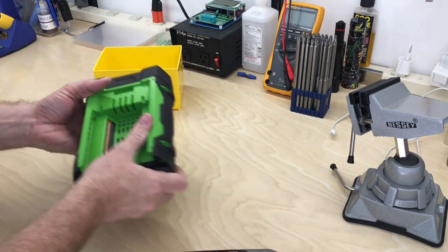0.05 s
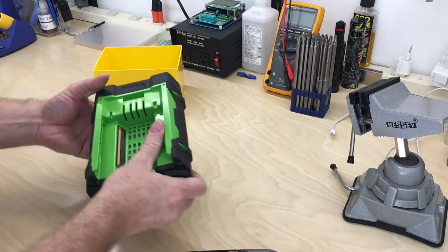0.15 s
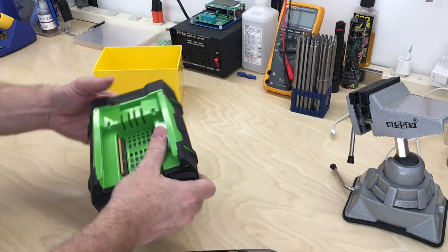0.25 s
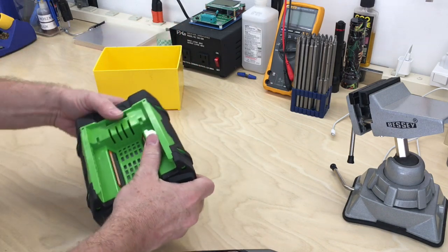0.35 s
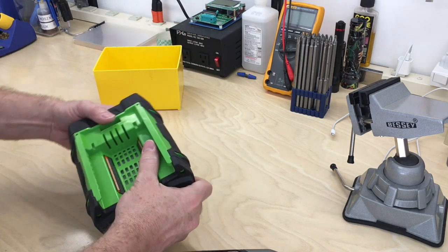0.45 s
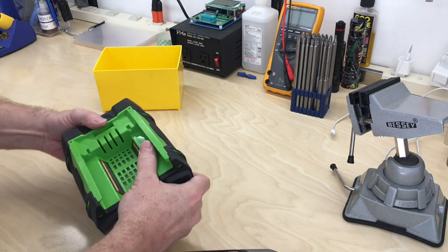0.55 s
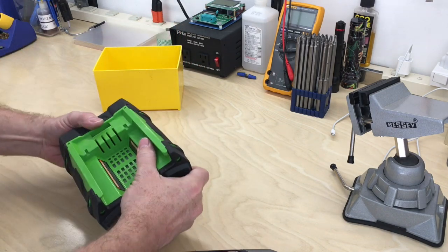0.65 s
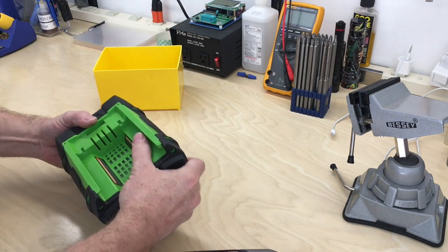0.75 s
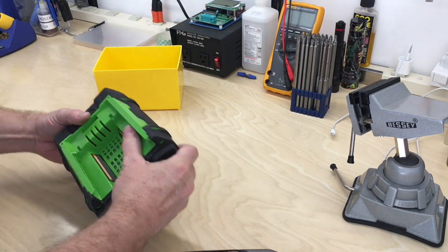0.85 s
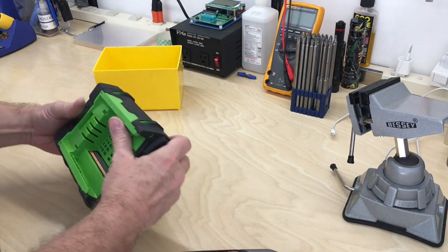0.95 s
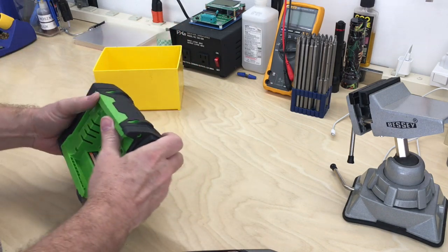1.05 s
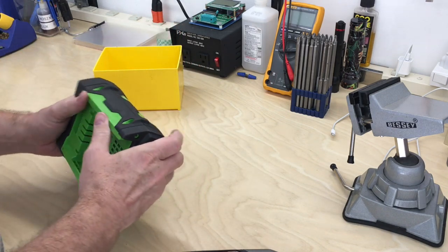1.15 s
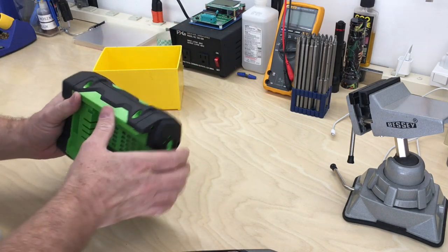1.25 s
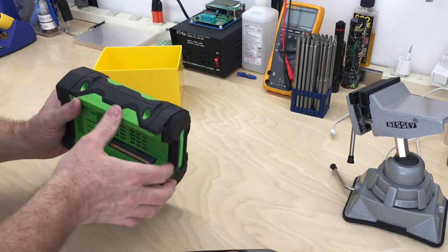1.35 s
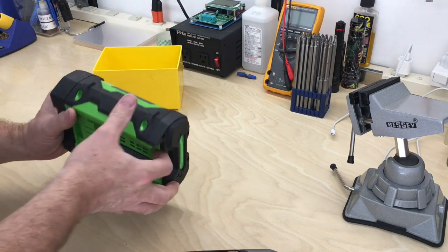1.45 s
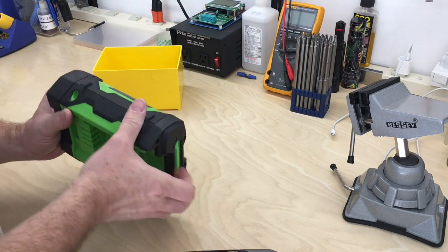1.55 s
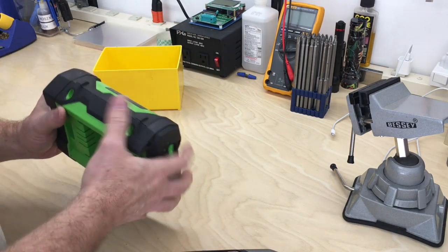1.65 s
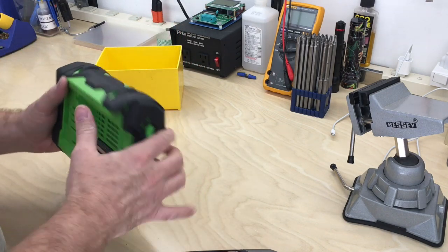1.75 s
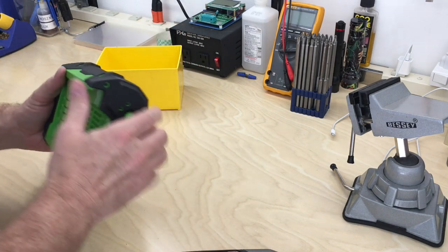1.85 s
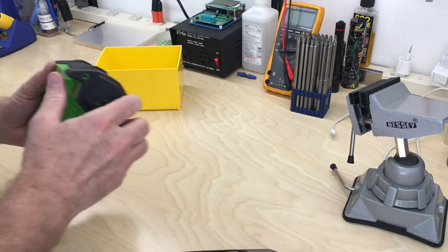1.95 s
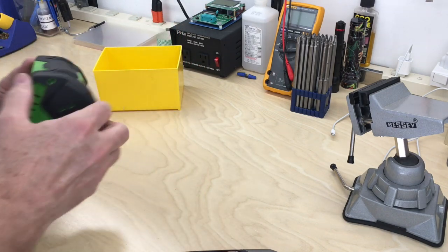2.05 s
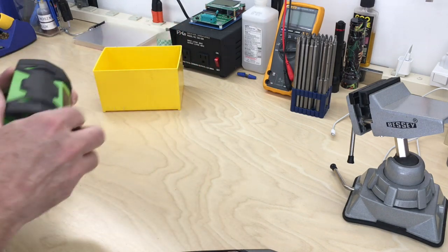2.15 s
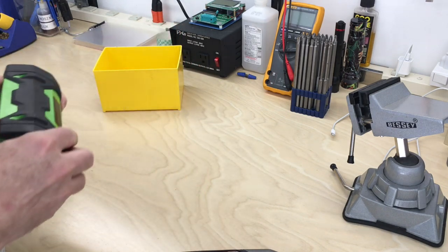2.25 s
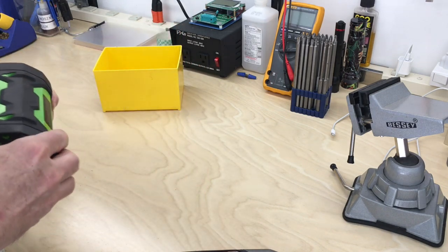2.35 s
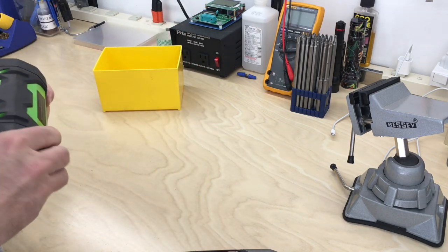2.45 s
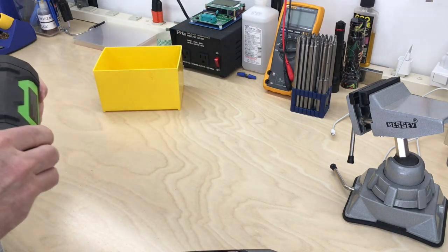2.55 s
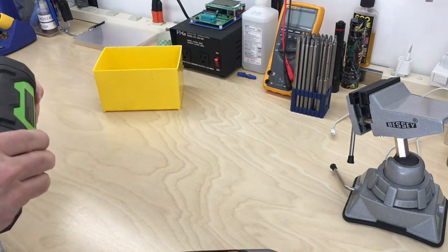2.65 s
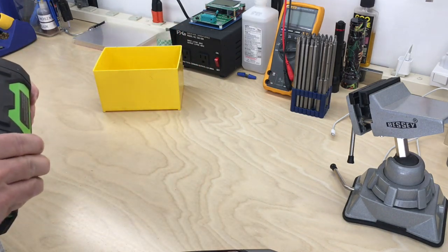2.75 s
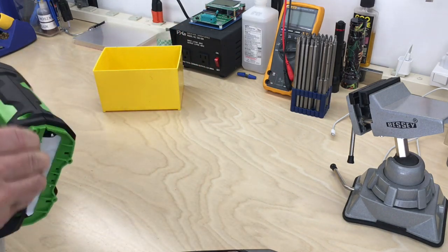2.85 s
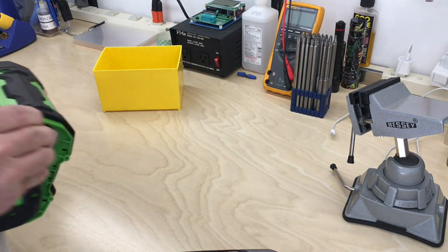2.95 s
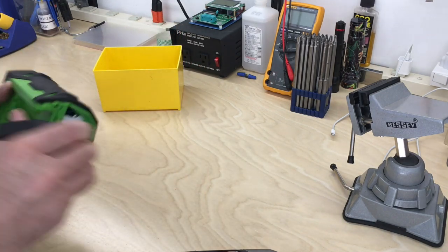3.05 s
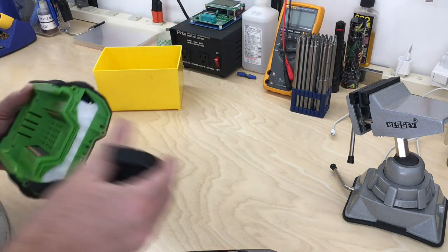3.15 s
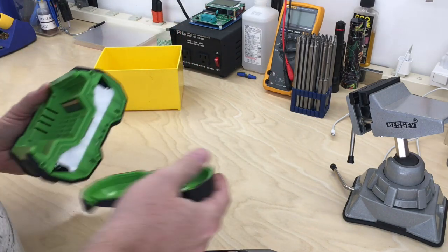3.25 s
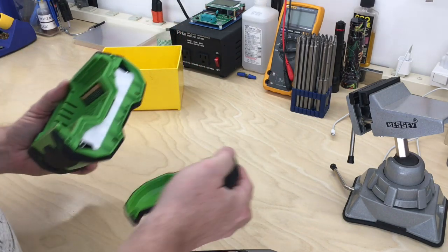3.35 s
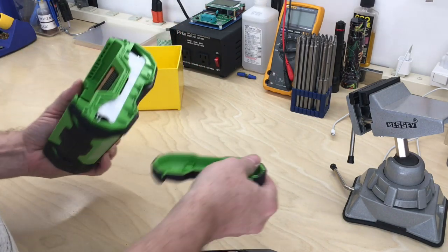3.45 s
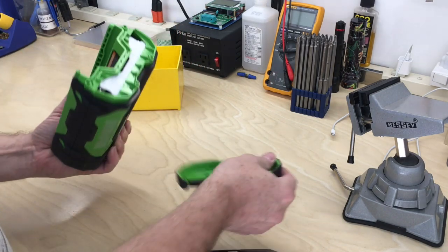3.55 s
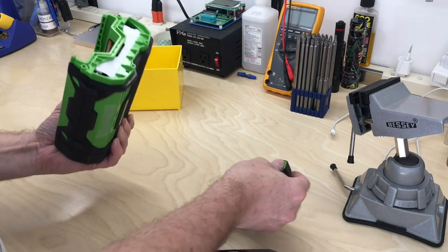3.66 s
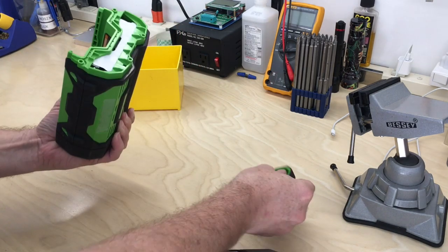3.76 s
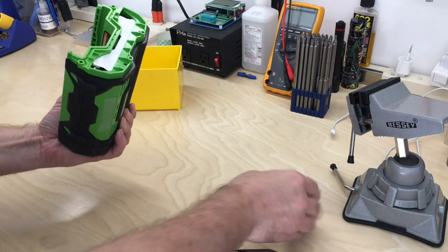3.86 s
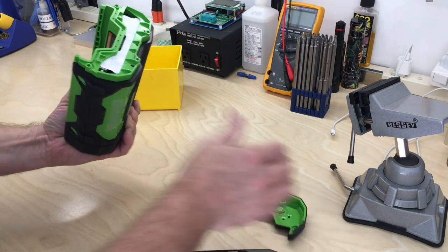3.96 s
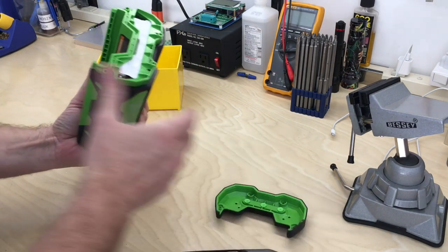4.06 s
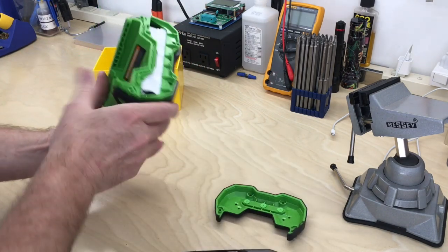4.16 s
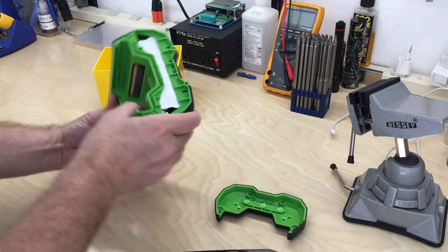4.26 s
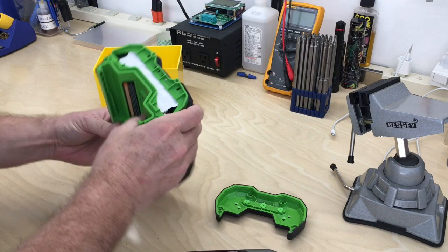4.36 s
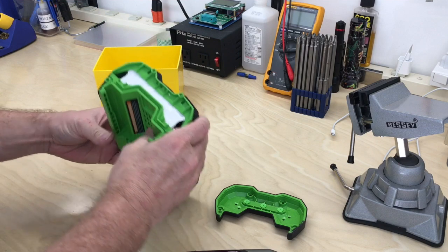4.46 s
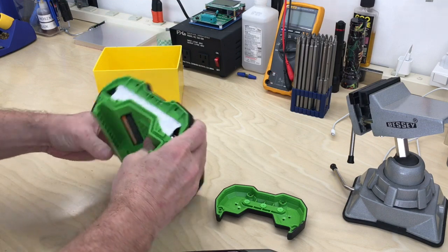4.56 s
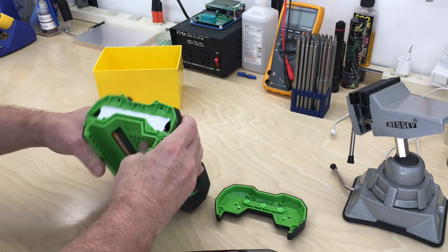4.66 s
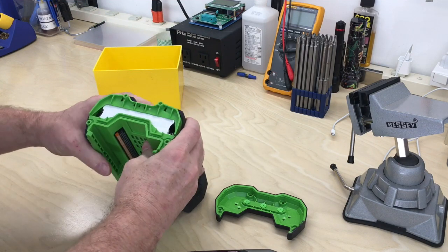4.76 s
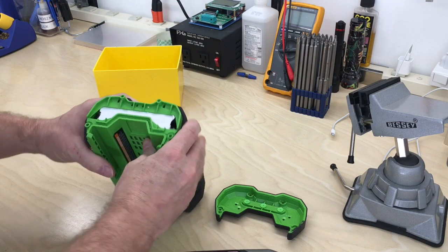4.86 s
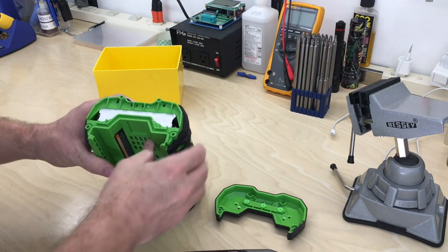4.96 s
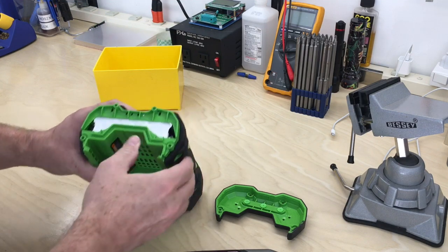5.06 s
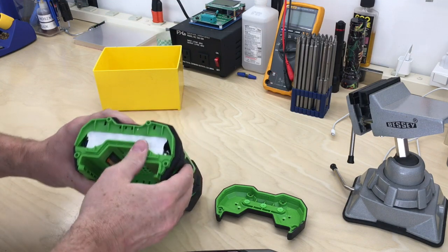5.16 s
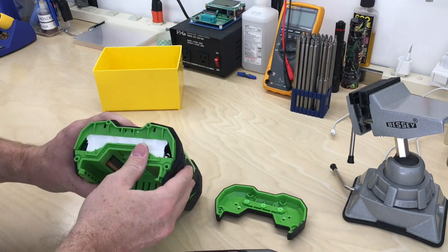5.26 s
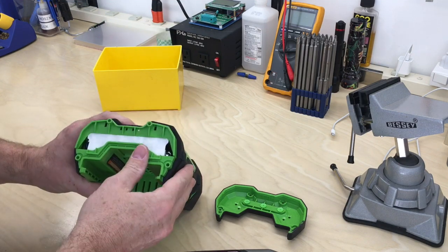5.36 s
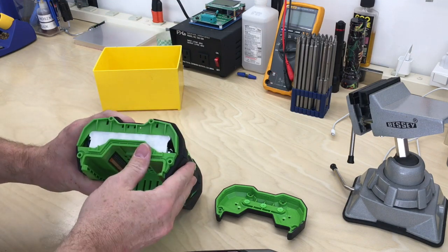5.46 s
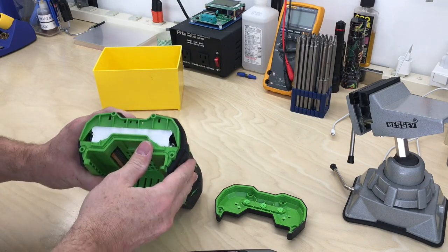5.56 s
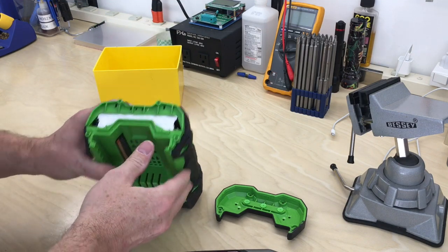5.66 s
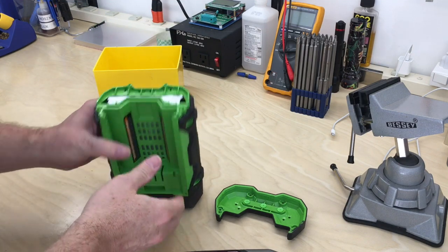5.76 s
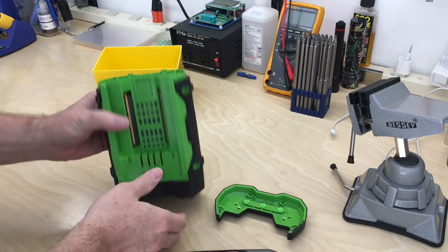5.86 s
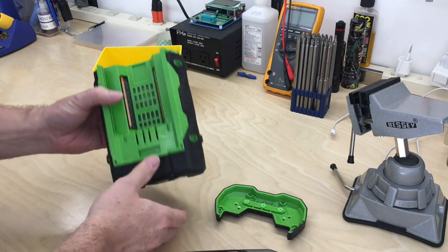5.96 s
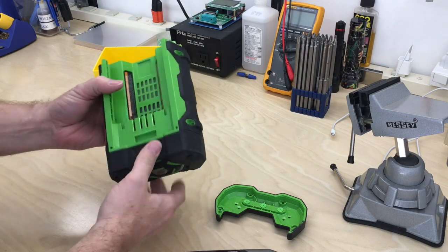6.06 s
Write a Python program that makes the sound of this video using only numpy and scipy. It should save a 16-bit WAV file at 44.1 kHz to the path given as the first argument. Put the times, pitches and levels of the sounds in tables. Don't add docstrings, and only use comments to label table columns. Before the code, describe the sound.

A quiet workshop with soft low ventilation, slight microphone hiss and a very faint high electrical whine. From 0 s, skin rubs hard plastic in gentle strokes with barely audible ticks. From about 0.6 to 3.3 s a distant wren repeats a quick, high trilling phrase, echoing outdoors; a hoarse falling chip comes at 1.2 s and again, fainter, at 3.6 s. Firmer seam ticks come near 1.5 and 1.8 s, then a sharper one at 2.55 s. At 2.8-2.95 s plastic clips let go in a rapid, loud burst of dry snaps, trailing small rattles. At 3.85 s the light cap lands on wood, bounces hard at 3.98 s, then rocks and scrapes to rest by 4.3 s. Handling rubs and clicks lead to a heavy low thud at 4.78 s, a soft shift at 4.98 s, faint rubbing, and a firmer second set-down at 5.89 s, with short room echo.

```python
import sys
import numpy as np
from scipy import signal
from scipy.fft import rfft, irfft, next_fast_len
from scipy.io import wavfile
from scipy.ndimage import uniform_filter1d

SR = 44100
rng = np.random.default_rng(int(sys.argv[2]) if len(sys.argv) > 2 else 0)


def boost(x):
    u = np.asarray(x, float) / 20
    return 10 ** u


def output_pcm(signal):
    pcm = np.clip(np.atleast_2d(signal).T, -1, 1) * 32767
    wavfile.write(sys.argv[1], SR, np.round(pcm).astype(np.int16))


N = 269892

# freq_hz, t60_s
ROOM_DECAY = [(100, 0.85), (700, 0.61), (2000, 0.55), (5000, .4), (12000, 0.21)]
# freq_hz, level_db (per Hz)
SLIDING_HISS = [(1500, -34), (3500, 7.5), (6000, 3.5), (10000, -1), (15500, -4.5), (16500, -45.5)]
SCATTER_DB = 1.7


def unit(x):
    return x / np.sqrt(np.mean(x ** 2) + 1e-20)


def along(points, hz):
    f, v = np.transpose(points)
    return np.interp(np.log(hz + 1), np.log(f + 1), v)


def filtered(x, response):
    m = next_fast_len(len(x) + 8192)
    return irfft(rfft(x, m) * response(np.fft.rfftfreq(m, 1 / SR)), m)[:len(x)]


def coloured(spectrum, x):
    return unit(filtered(x, lambda hz: boost(along(spectrum, hz))))


def reverb(x, decays, gap_s):
    hz, t, z = signal.stft(rng.standard_normal(SR // 2), SR, nperseg=256)
    decay = boost(-60 * t / np.abs(along(decays, hz))[:, None])
    tail = signal.istft(z * decay, SR, nperseg=256)[1]
    delayed = np.pad(x, (round(gap_s * SR), 0))
    return signal.fftconvolve(delayed, tail / np.linalg.norm(tail))


def add(track, start_s, sound):
    part = track[round(start_s * SR):][:len(sound)]
    part += sound[:len(part)]


def air():
    # freq_hz, level_db (per Hz)
    vent = [(12, -41.5), (20, -11), (65, -3.5), (130, -6), (216, 1), (285, -4.5), (347, -11.5), (698, -34)]
    # freq_hz, level_db (per Hz)
    mic_hiss = [(100, -22.5), (698, -23), (1600, -28), (4810, -38), (7310, -36.5), (13900, -44.5),
                (16000, -63.5)]
    # time_s, level_db
    charger = [(0, -102), (.7, -86), (2, -81), (3.8, -77.5), (4.6, -81.5), (6.12, -85)]
    # freq_hz, width_hz, level_db
    whines = [(7280, 300, -88.5), (9440, 300, -94.5), (10900, 250, -101)]
    charger_hz = 1534
    t = np.arange(N) / SR
    out = boost(-65.5) * coloured(vent + [(2000, -87.5)], rng.standard_normal(N))
    out += boost(-74.5) * coloured(mic_hiss, rng.standard_normal(N))
    out += boost(np.interp(t, *np.transpose(charger))) * np.sin(2 * np.pi * charger_hz * t)
    for hz, width_hz, db in whines:
        band = filtered(rng.standard_normal(N), lambda f: np.exp(-((f - hz) / width_hz) ** 2))
        out += boost(db) * unit(band)
    return out


def whistle(length_s, from_hz, to_hz, hoarse_rad):
    u = np.linspace(0, 1, round(length_s * SR))
    rasp = hoarse_rad * unit(uniform_filter1d(rng.standard_normal(len(u)), size=60))
    phase = 2 * np.pi * np.cumsum(from_hz + (to_hz - from_hz) * u) / SR
    return np.sin(phase + rasp) * np.sqrt(np.sin(np.pi * u) + 1e-9)


def wren():
    # start_s, length_s, from_hz, to_hz, level_db
    notes_sung = [
        (0, 0.05, 3116, 3420, 1),
        (0.044, .035, 3447, 3874, -1),
        (0.072, .045, 3900, 4075, 0),
        (0.121, 0.054, 4740, 4520, -3.5),
        (0.154, 0.037, 2890, 2880, 2.5),
        (0.192, 0.063, 2408, 2225, -4),
    ]
    # freq_hz, t60_s
    yard_decay = [(2000, 0.92), (5000, 0.51)]
    first_s, spacing_s, slowing_s = 0.609, 0.291, 0.0016
    song_db, warm_up_db, warm_up_phrases = -67, -3.5, 3.0
    sag_per_phrase, last_pitch = 0.005, 0.935
    out = np.zeros(N)
    for k in range(9):
        start_s = first_s + spacing_s * k + slowing_s * k * k
        phrase_db = song_db + warm_up_db * np.exp(-k / warm_up_phrases)
        pitch = 1 - sag_per_phrase * k if k < 8 else last_pitch
        phrase = np.zeros(SR // 3)
        for note_s, length_s, from_hz, to_hz, note_db in notes_sung:
            droop = pitch if note_s < 0.1 else pitch ** 0.25
            note = whistle(length_s, from_hz * droop, to_hz * droop, hoarse_rad=0.55)
            add(phrase, note_s, boost(phrase_db + note_db + rng.normal(0, 1.2)) * note)
        add(out, start_s, 0.2 * phrase)
        add(out, start_s, reverb(phrase, yard_decay, gap_s=0.0017))
    return out


def chipping_bird():
    # start_s, length_s, from_hz, to_hz, level_db
    chips = [
        (1.225, 0.038, 5700, 2996, -52.5),
        (3.55, 0.039, 5330, 2957, -55),
    ]
    # freq_hz, t60_s
    tree_decay = [(3000, 0.83), (5500, 0.3)]
    out = np.zeros(N)
    for start_s, length_s, from_hz, to_hz, db in chips:
        chip = whistle(length_s, from_hz, to_hz, hoarse_rad=1.1)
        add(out, start_s, boost(db) * reverb(chip, tree_decay, gap_s=0))
    return out


def friction(strokes, layers, rise, grain_db, grain_samples):
    grain = boost(grain_db * unit(uniform_filter1d(rng.standard_normal(N), grain_samples)))
    peak_s, length_s, db, bright_db = np.transpose(strokes)[..., None]
    late_s = np.arange(0, N + 64, 64) / SR - peak_s
    side_s = length_s * np.where(late_s < 0, rise, 1 - rise)
    swell = np.exp(-2 * (late_s / side_s) ** 2)
    out = np.zeros(N)
    for spectrum, layer_db, share in layers:
        level = np.sum(boost(db + layer_db + share * bright_db) * swell, axis=0)
        out += np.repeat(level, 64)[:N] * coloured(spectrum, rng.standard_normal(N) * grain)
    return out


def rubbing_hands():
    # peak_s, length_s, pressure_db, hiss_db (re pressure)
    strokes = [(0.0, 0.3, -68.5, 1.5), (.19, 0.1, -69, 2), (.325, 0.14, -74, 3), (.47, 0.06, -86.5, 10.5),
               (.6, 0.065, -76.5, -1), (1.02, .06, -84, 8), (1.265, 0.19, -75, -2),
               (1.465, 0.0692, -73, 1.5), (1.632, 0.046, -66, 1.5), (1.775, 0.09, -70, 1),
               (1.972, 0.049, -76.5, 8), (2.15, .08, -80.5, 8.5), (2.262, 0.086, -80, 4),
               (2.445, 0.063, -72, 0), (3.56, 0.7, -83.5, 5.5), (4.3, 0.12, -72, 2),
               (4.434, 0.045, -68, -0.5), (4.48, 0.069, -73.5, 1.5), (4.72, 0.35, -73, -2.5),
               (4.945, 0.095, -70, -1), (5.035, 0.093, -76, 3), (5.258, 0.061, -68.5, -2),
               (5.715, 0.12, -72.5, -2), (1.9, 2.3, -81.5, -5)]
    # freq_hz, level_db (per Hz)
    creak = [(250, -59), (550, -1.5), (800, 1.5), (1300, 2), (2200, -28)]
    # freq_hz, level_db (per Hz)
    scrape = [(800, -66.5), (1500, 3), (2300, 2.5), (3500, -9.5), (6000, -45.5)]
    layers = ((creak, -2.5, -0.3), (scrape, 0, 0), (SLIDING_HISS, 0, 1))
    return friction(strokes, layers, rise=0.51, grain_db=1.0, grain_samples=90)


def rocking_cap():
    # peak_s, length_s, pressure_db, scrape_db (re pressure)
    rocks = [
        (3.865, 0.056, -42, -9),
        (3.915, .06, -45.5, -12.5),
        (3.962, 0.0075, -45, -5.5),
        (4.085, 0.051, -46.5, 2),
        (4.155, 0.046, -47, -6.5),
        (4.205, 0.035, -46.5, -4),
        (4.245, 0.16, -50, -1.5),
    ]
    # freq_hz, level_db (per Hz)
    rumble = [(70, -36.5), (120, -10.5), (200, 8.5), (320, 8), (450, -2), (800, -57.5)]
    # freq_hz, level_db (per Hz)
    grind = [(300, -26.5), (500, 14), (1100, 13), (1800, -4), (3000, -32), (5000, -47.5)]
    layers = ((rumble, 0, 0), (grind, 0, 1), (SLIDING_HISS, -37.5, 0))
    return friction(rocks, layers, rise=0.4, grain_db=-1, grain_samples=200)


def bench(landings, modes, split_hz):
    out, t = np.zeros(N), np.arange(SR) / SR
    for start_s, db, upper_db, contact_s in landings:
        wood = np.zeros(SR)
        for k, (hz, mode_db, t60_s) in enumerate(modes):
            level_db = mode_db + upper_db * (hz > split_hz) + rng.normal(0, SCATTER_DB)
            ring = boost(level_db - 60 * t / t60_s) * np.sin(2 * np.pi * hz * t)
            wood += (-1) ** k * ring
        push = t / contact_s * np.exp(-3 * t / contact_s)
        add(out, start_s, boost(db) * signal.fftconvolve(wood, push[:2000] / push.sum()))
    out += boost(-15) * reverb(out, ROOM_DECAY, gap_s=0.00796)[:N]
    return filtered(out, lambda f: (1j * f / (1j * f + 40)) ** 2)


def shell_response(f, shell, upper_db):
    total = 0
    for k, (hz, width_hz, mode_db) in enumerate(shell):
        level_db = mode_db + upper_db / (1 + (1500 / hz) ** 6) + rng.normal(0, SCATTER_DB)
        resonance = 1j * f * width_hz / (hz * hz - f * f + 1j * f * width_hz)
        total = total + (-1) ** k * boost(level_db) * resonance
    return total


def contacts(events, shell, room_db):
    # freq_hz, level_db (per Hz)
    crack_spectrum = [(1470, -33.5), (2500, -4), (6550, 4.5), (7420, -4), (8940, 0), (9890, -7.5),
                      (14500, -11.5), (16000, -29.5)]
    out, t = np.zeros(N), np.arange(SR // 6) / SR
    for start_s, db, upper_db, crack_db, t60_s in events:
        fade = boost(-60 * t / t60_s)
        force = rfft(rng.standard_normal(len(t)) * (fade + 1.9 * boost(-60 * t / 0.0021)))
        force /= np.sqrt(np.abs(uniform_filter1d(np.abs(force) ** 2, size=30)))
        blow = irfft(force, len(t)) * (t < t60_s)
        chatter = filtered(blow, lambda f: shell_response(f, shell, upper_db))
        crack_fade = fade ** 0.75 + 0.76 * boost(-60 * t / 0.007)
        crack = coloured(crack_spectrum, rng.standard_normal(len(t))) * crack_fade
        near = chatter / np.abs(chatter).max() * boost(max(upper_db, 0))
        near += boost(crack_db - 5.5) * crack
        add(out, start_s, boost(db) * near)
        power = uniform_filter1d(np.abs(rfft(near)) ** 2, size=60)
        even = np.roll(irfft(np.sqrt(np.abs(power))), 200)[:400]
        add(out, start_s, boost(db + room_db) * reverb(even, ROOM_DECAY, gap_s=0.003))
    return out


def snapping_pack():
    # start_s, peak_db, upper_db (re peak), crack_db (re peak), t60_s
    ticks = [(0.431, -68, 11, -30, 0.094), (0.64, -70.5, 10, -4, 0.027), (0.686, -69, 7, -5, 0.034),
             (0.716, -64, 3.5, -10, 0.032), (0.799, -69, 4, -1, 0.027), (1.472, -49.5, -1, -24, 0.084),
             (1.531, -53.5, 1, -5, 0.042), (1.799, -51, -7.5, -6.5, 0.038), (2.542, -60, 12.5, 7.5, 0.06),
             (2.549, -40.5, 2, -8, 0.011), (2.554, -43, -16.5, -18.5, 0.085),
             (2.704, -57.5, -9.5, -17, 0.019), (3.249, -69.5, 3.5, 5.5, 0.035),
             (4.352, -44.5, 4, -6.5, 0.028), (4.979, -42.5, -13, -41, 0.061),
             (5.841, -66, -11.5, 13.5, 0.011)]
    # start_s, peak_db, upper_db (re peak), crack_db (re peak), t60_s
    snaps = [
        (2.816, -20, -6.5, -8.5, 0.044),
        (2.839, -17, -11, -7.5, 0.038),
        (2.8875, -16, 1, -15.5, 0.06),
        (2.896, -18.5, -0.5, -15, 0.038),
        (2.9024, -12.5, 1.5, -14.5, 0.03),
        (2.934, -31, -5, -18, 0.016),
        (2.947, -29.5, -5, -19, 0.074),
        (2.984, -39, -8.5, -11, 0.014),
        (3.029, -39.5, 1, -7.5, 0.037),
    ]
    # freq_hz, width_hz, level_db
    pack_shell = [(287, 76, -10), (530, 290, -10), (677, 100, 1), (872, 57, 4.5), (1190, 340, 0),
                  (1564, 300, 2.5), (1824, 130, -5), (2106, 200, -2.5), (2640, 180, -5.5),
                  (3026, 850, -11.5), (3854, 200, -9), (4230, 270, -13.5)]
    return contacts(ticks + snaps, pack_shell, room_db=-12.5)


def dropped_cap():
    # start_s, peak_db, upper_db (re peak), crack_db (re peak), t60_s
    drops = [(3.845, -30.5, -18, -50, 0.039), (3.852, -50.5, 4.5, -7.5, 0.033),
             (3.938, -46.5, 1.5, -14.5, 0.033), (3.9712, -19.5, -17, -46.5, 0.044),
             (3.975, -43.5, -1, -1.5, 0.037), (3.9835, -16.5, 6, -11, 0.039),
             (3.995, -18.5, -6.5, -14, 0.063), (4.059, -23, -6, -30.5, 0.07),
             (4.063, -36.5, -14, -8.5, 0.061), (4.132, -28, -9, -55, 0.035),
             (4.181, -34.5, -5.5, -60, 0.081), (4.227, -35.5, -11, -42, 0.025),
             (4.254, -43, -44, -40, 0.065)]
    # freq_hz, width_hz, level_db
    cap_shell = [(323, 230, 1), (650, 87, 3.5), (990, 193, 1), (1360, 260, 1.5), (1490, 110, 5.5),
                 (1824, 180, 2), (2304, 270, -2), (2512, 310, -5), (3065, 240, -13), (3650, 150, -6),
                 (4170, 367, -20)]
    # start_s, peak_db, upper_db (re peak), contact_s
    landings = [
        (3.844, -32.5, 3, 0.003),
        (3.973, -68, -1, 0.002),
        (3.984, -39, 3.5, 0.00085),
        (4.061, -49.5, 12, 0.0013),
        (4.132, -40, -31, 0.0008),
        (4.179, -45, 5, 0.0014),
        (4.227, -34, 7, 0.0045),
        (4.254, -43, 0, 0.002),
    ]
    # freq_hz, level_db, t60_s
    light_top = [(110, -4.5, 0.25), (160, 2.5, 0.05), (261, 7, 0.074), (326.2, 11.5, 0.049),
                 (406, -8, 0.069)]
    return contacts(drops, cap_shell, room_db=-9.5) + bench(landings, light_top, split_hz=220)


def pack_set_down():
    # start_s, peak_db, upper_db (re peak), crack_db (re peak), t60_s
    thuds = [
        (4.777, -31, -5, -16.5, 0.1),
        (4.785, -28.5, -3, -25, 0.09),
        (4.812, -31.5, -12, -38, 0.066),
        (5.881, -68, 0, 14, 0.011),
        (5.888, -36.5, -10, -2.5, 0.02),
        (5.8915, -21, -13.5, -25, 0.078),
        (5.898, -23.5, -10.5, -38.5, 0.11),
        (5.983, -37, -33, -45, 0.064),
    ]
    # freq_hz, width_hz, level_db
    base_shell = [(393, 67, 3), (650, 214, 3), (730, 150, 4), (1020, 220, -2.5), (1343, 310, -0.5),
                  (1760, 204, 1), (2090, 220, -1.5), (2840, 410, -4.5), (3480, 410, -4), (3900, 310, -7.5),
                  (4580, 540, -15)]
    # start_s, peak_db, upper_db (re peak), contact_s
    landings = [
        (4.777, -17.5, -1.5, 0.0028),
        (4.981, -26, -5, 0.0075),
        (5.89, -22.5, 3.5, 0.0014),
        (5.985, -69, 16, 0.00074),
    ]
    # freq_hz, level_db, t60_s
    bench_top = [(59, -5.5, 0.21), (82, -2.5, 0.099), (122.6, -1.5, 0.25), (172.5, -3, 0.25),
                 (199.2, 1, 0.098), (279, -0.5, 0.13), (321.3, -2.5, 0.13), (422.7, -9.5, 0.2),
                 (610, -25, 0.1)]
    # start_s, peak_db, upper_db (re peak), contact_s
    sway = [
        (4.79, -50.5, 0, 0.002),
    ]
    # freq_hz, level_db, t60_s
    frame = [(108, -5, 2.7), (115, 0.5, 3.9)]
    out = contacts(thuds, base_shell, room_db=-9.5)
    out += bench(landings, bench_top, split_hz=145)
    return out + bench(sway, frame, split_hz=145)


def scene():
    outside = wren() + chipping_bird()
    sliding = rubbing_hands() + rocking_cap()
    blows = snapping_pack() + dropped_cap() + pack_set_down()
    return (air() + outside + sliding + blows)[None]


def band_limit(x):
    return signal.sosfilt(signal.butter(12, 16500, fs=SR, output="sos"), x)


def record(dry):
    return band_limit(dry)


dry = scene()
out = record(dry)
output_pcm(out)
```